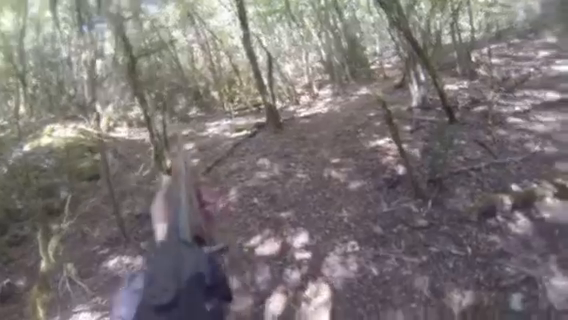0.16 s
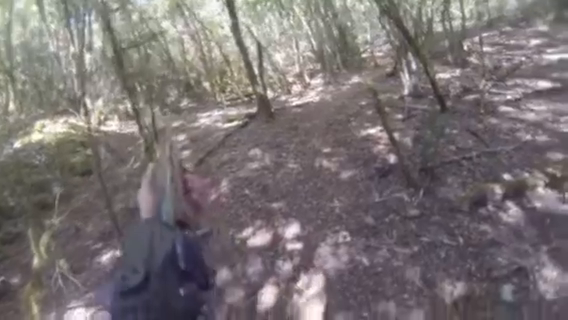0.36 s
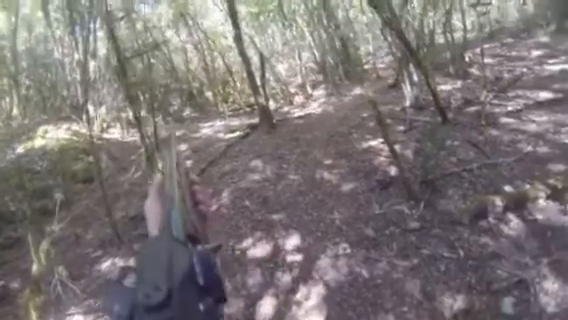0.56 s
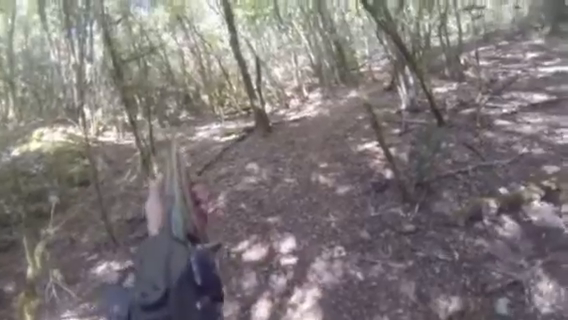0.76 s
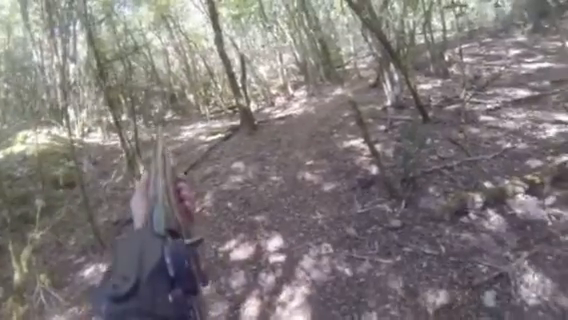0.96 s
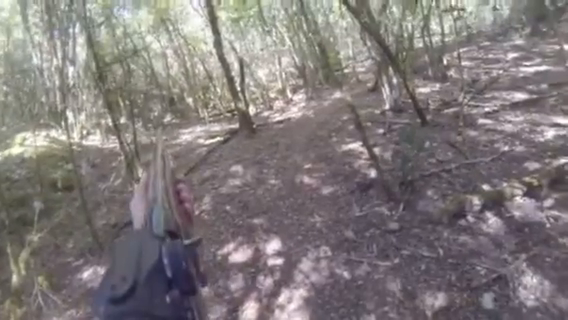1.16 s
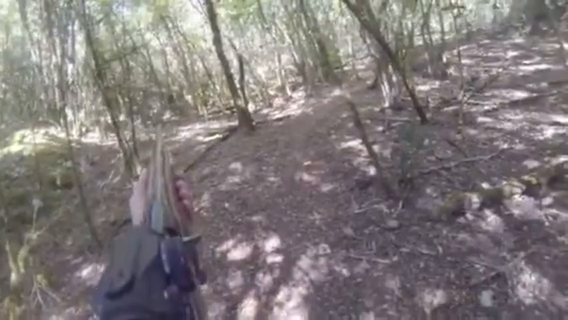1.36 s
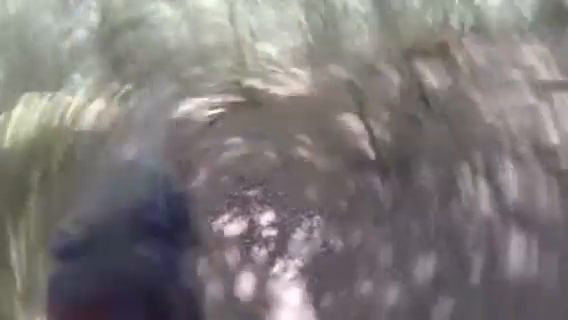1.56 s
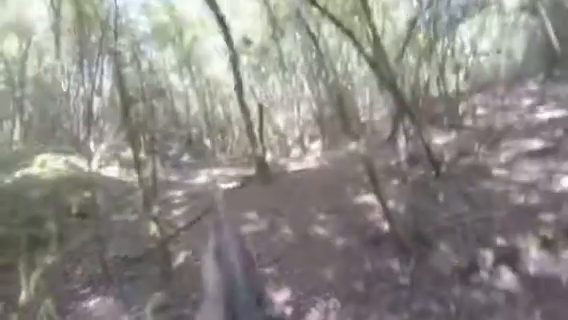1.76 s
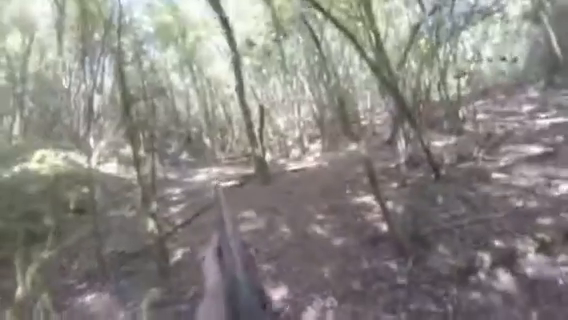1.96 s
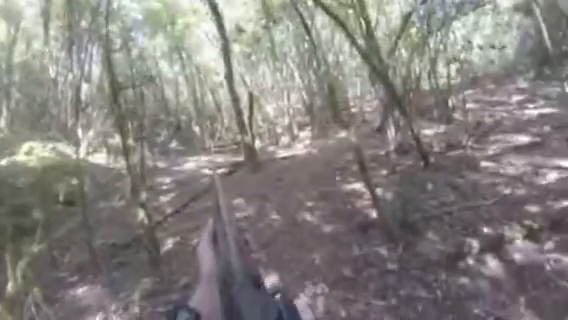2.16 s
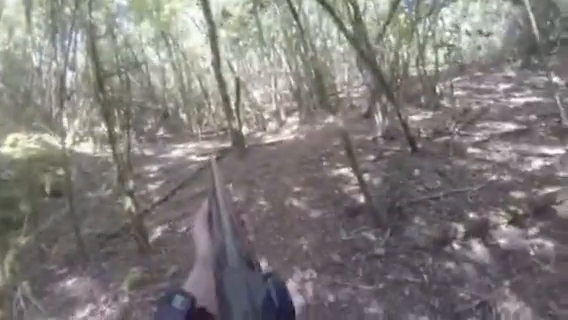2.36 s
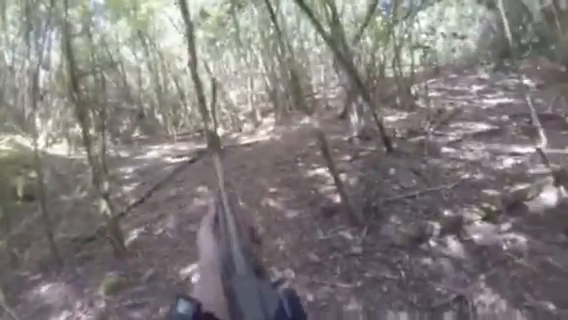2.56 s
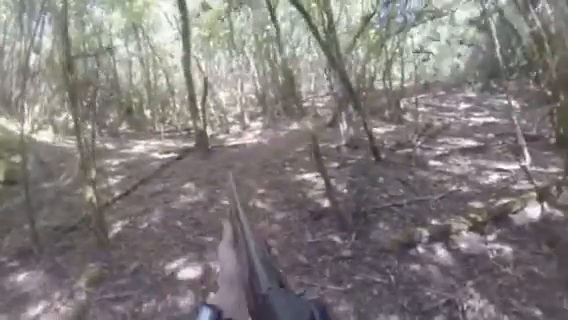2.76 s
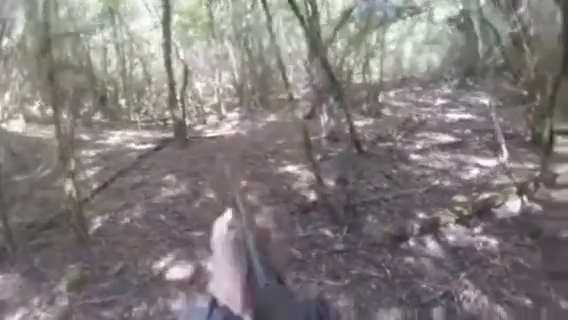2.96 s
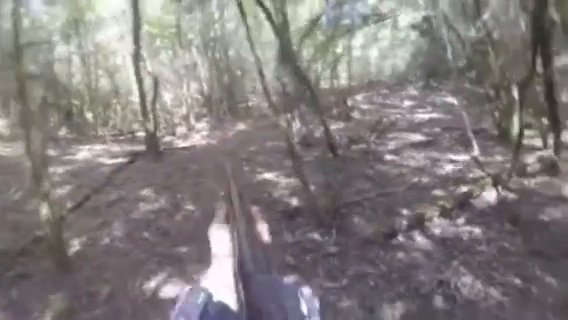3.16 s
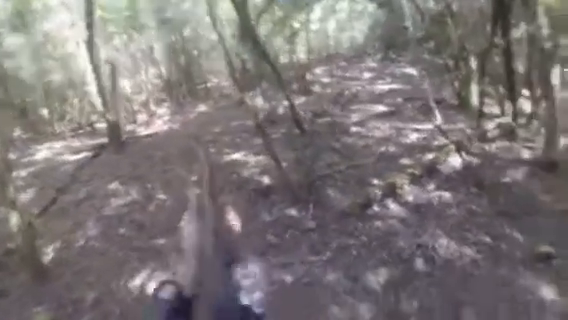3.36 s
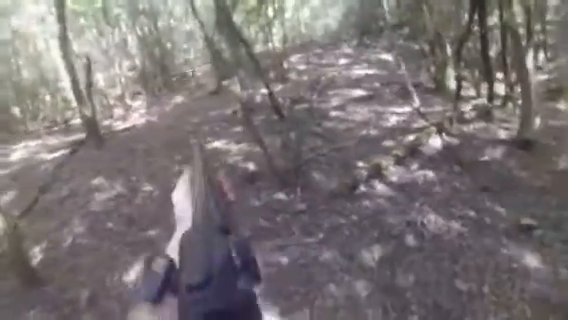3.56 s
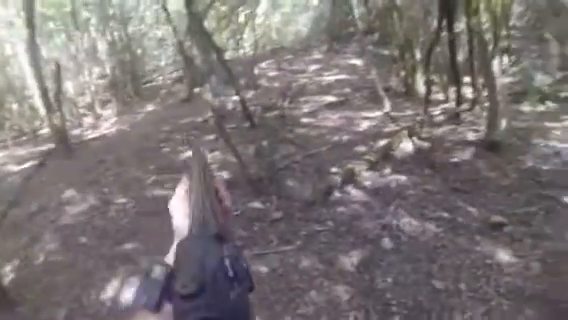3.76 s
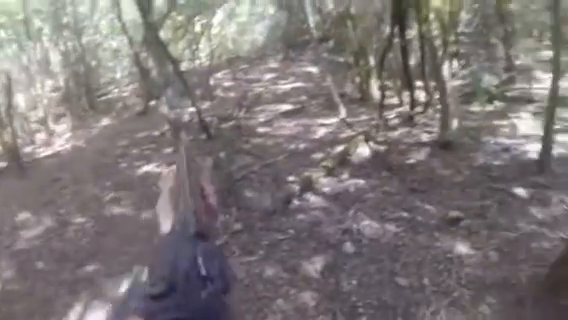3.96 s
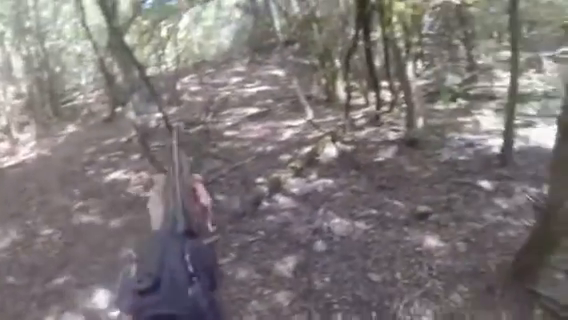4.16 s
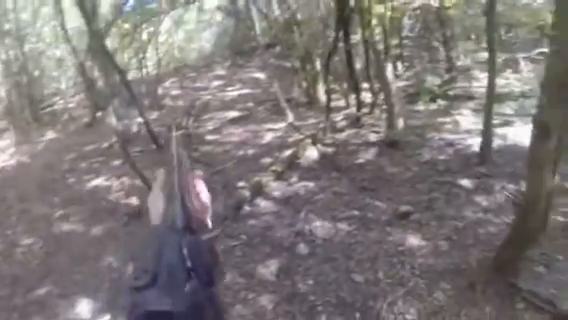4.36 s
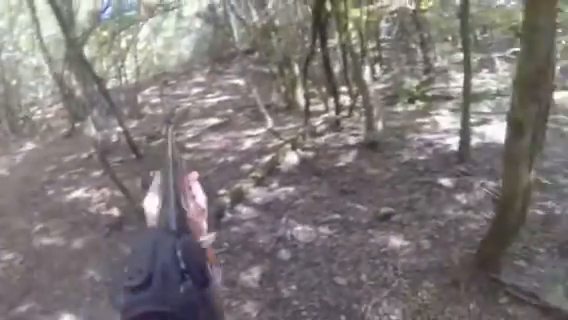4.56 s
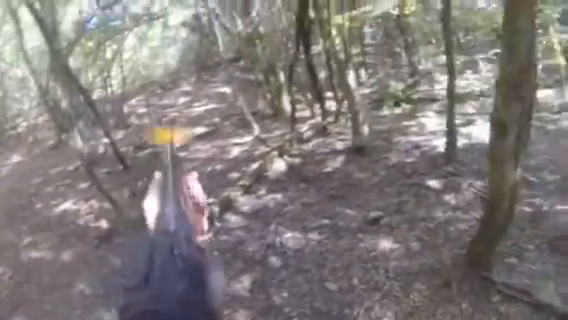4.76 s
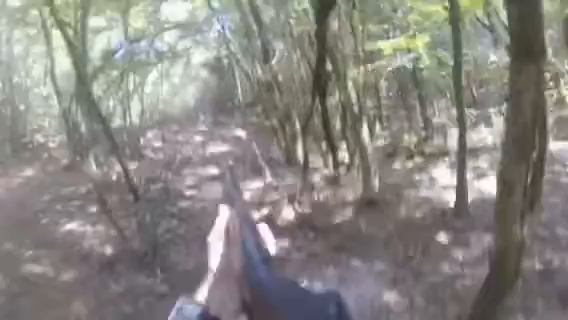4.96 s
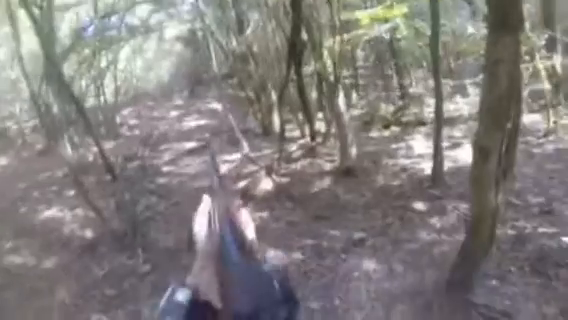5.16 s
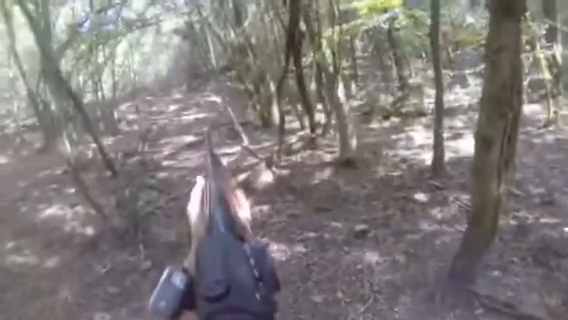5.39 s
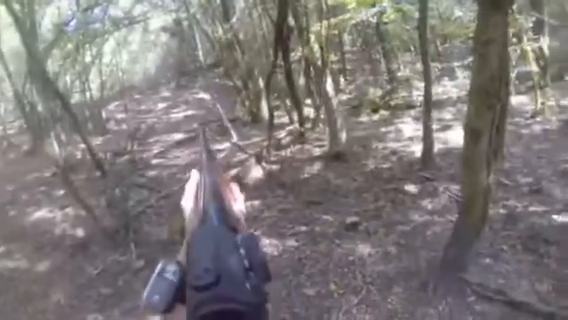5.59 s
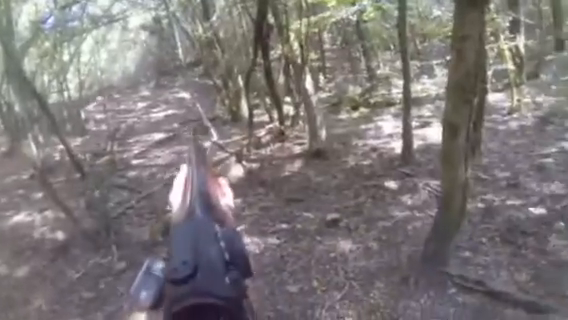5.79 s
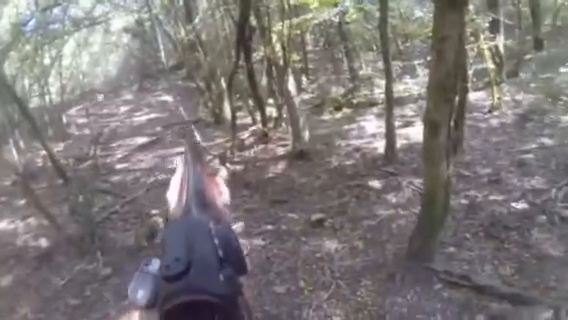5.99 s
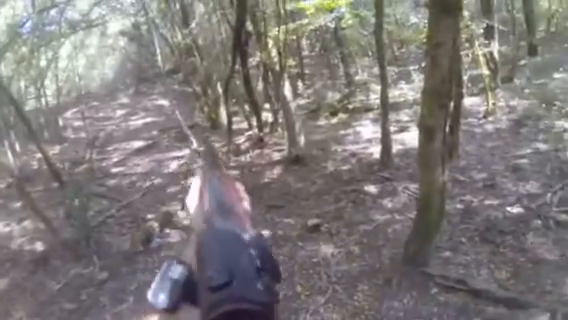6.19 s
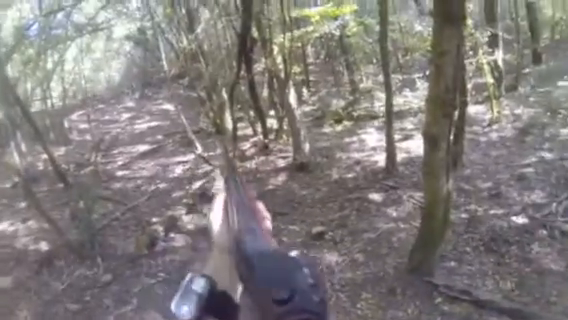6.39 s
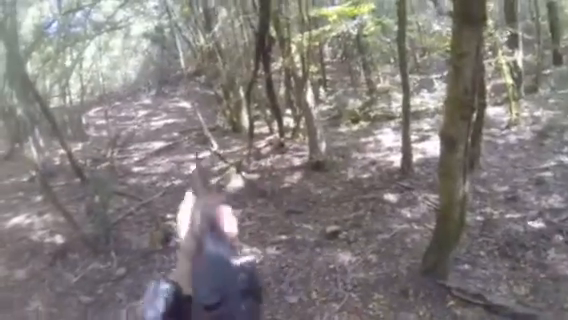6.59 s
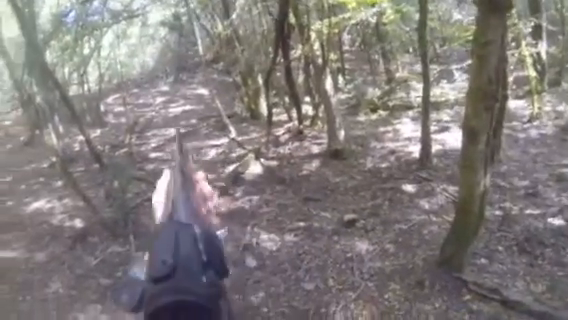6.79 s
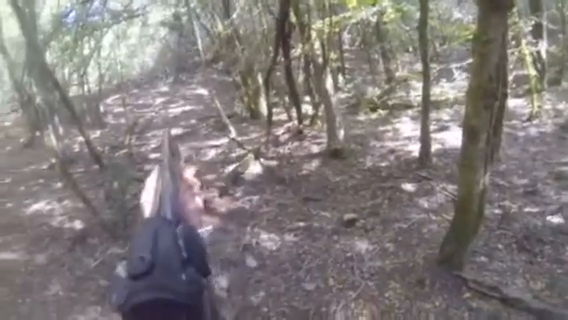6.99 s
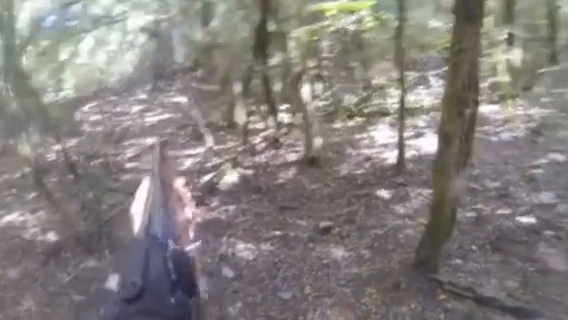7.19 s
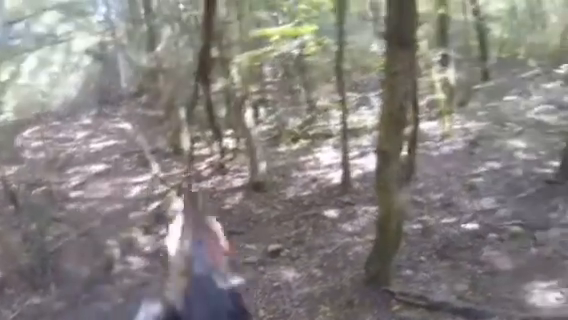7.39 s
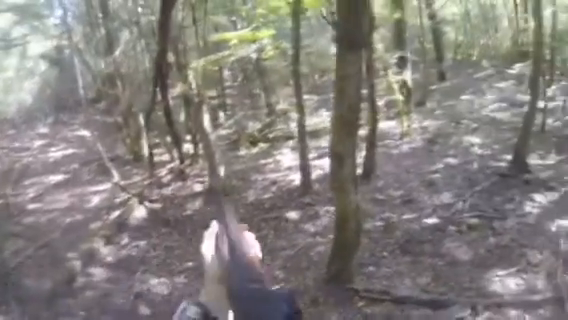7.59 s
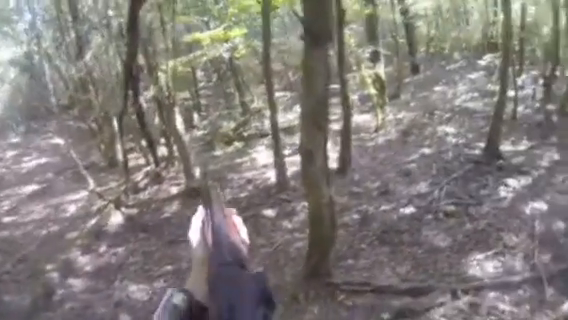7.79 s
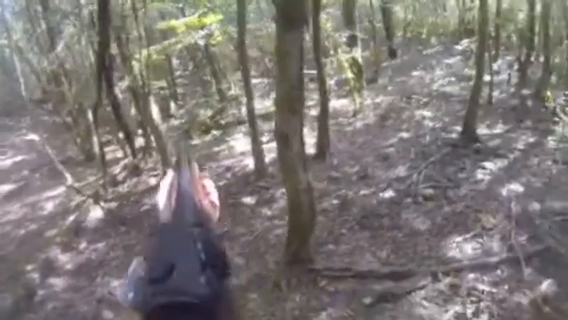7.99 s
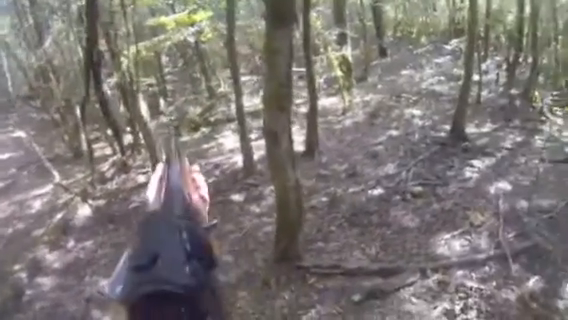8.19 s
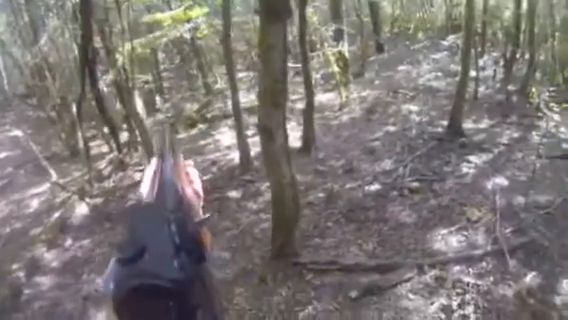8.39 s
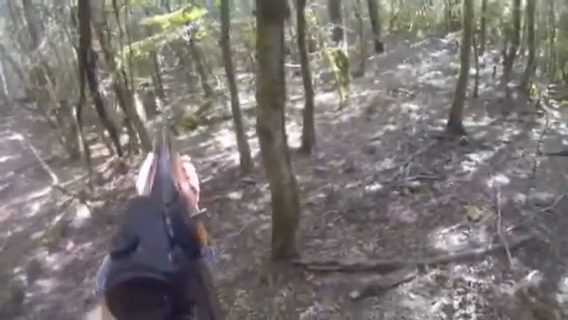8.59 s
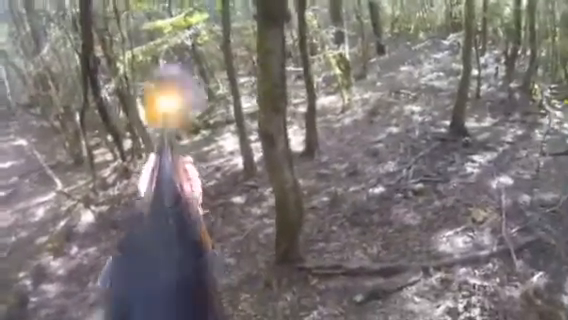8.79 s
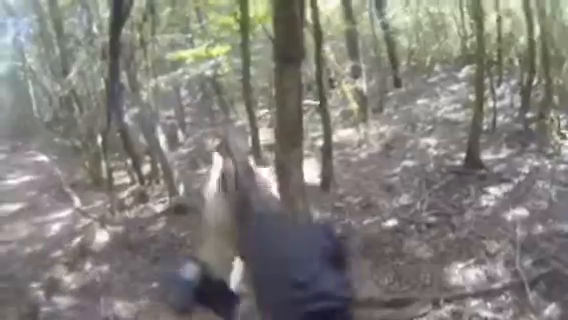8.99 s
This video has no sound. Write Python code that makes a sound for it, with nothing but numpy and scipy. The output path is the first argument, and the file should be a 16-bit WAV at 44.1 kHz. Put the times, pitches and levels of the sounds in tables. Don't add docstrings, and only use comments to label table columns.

```python
import sys
import numpy as np
from scipy import signal
from scipy.fft import rfft, irfft, next_fast_len
from scipy.io import wavfile
from scipy.ndimage import uniform_filter1d

SR = 44100
rng = np.random.default_rng(int(sys.argv[2]) if len(sys.argv) > 2 else 0)


def waveform_to_disk(signal):
    frames = np.transpose(np.atleast_2d(signal))
    scaled = np.clip(frames, -1, 1) * 32767
    samples = np.round(scaled).astype(np.int16)
    wavfile.write(sys.argv[1], SR, samples)


def field_ratio(decibels):
    return 10 ** (np.asarray(decibels, dtype=float) / 20)


N = 398663
SIZE = next_fast_len(N)
FREQ, TIME = np.fft.rfftfreq(SIZE, 1 / SR) + 1e-3, np.arange(N) / SR


def unit(x):
    return x / np.sqrt(np.mean(x ** 2))


def add(out, start_s, x):
    i = int(start_s * SR)
    out[i:i + len(x)] += x[:N - i]


def curve(table, at):
    s, *columns = np.transpose(table)
    return [np.interp(at, s, column) for column in columns]


def colour(table, hz):
    f, db = np.transpose(table)
    return np.interp(np.log(hz), np.log(f), db)


def shaped(x, table, lo_hz, hi_hz):
    spectrum = rfft(x, SIZE) * field_ratio(colour(table, FREQ))
    reference = irfft(spectrum * (FREQ > lo_hz) * (FREQ < hi_hz), SIZE)
    return irfft(spectrum, SIZE)[:N] / np.std(reference)


def band(x, hz, width_hz):
    b, a = signal.iirpeak(min(hz, .45 * SR), max(hz / width_hz, .3), SR)
    return signal.lfilter(b, a, x)


def lowpass(x, order, hz):
    return signal.sosfilt(signal.butter(order, hz, fs=SR, output="sos"), x)


def walk(rate_hz, step=32):
    k = int(SR / rate_hz / step)
    held = np.repeat(rng.standard_normal(N // (k * step) + 2), k)
    slewed = uniform_filter1d(uniform_filter1d(held, k), k)
    return 1.16 * np.interp(TIME * SR / step, np.arange(len(held)), slewed)


def grains(rate_hz, spread_db):
    sizes = field_ratio(spread_db * np.minimum(rng.exponential(size=N), 3.))
    return unit(rng.standard_normal(N) * (rng.random(N) < rate_hz / SR) * sizes)


def snaps(table, trim_db):
    out, t = np.zeros(N), np.arange(8192) / SR
    for s, db, hz, share, t60_s in table:
        width_hz = hz * np.clip(share, .005, 2)
        noise = rng.standard_normal(2 * len(t))
        snap = unit(band(band(noise, hz, width_hz), hz, 1.3 * width_hz)[len(t):])
        envelope = np.clip(t / 0.00034, 0, 1) * 1000 ** (-t / max(t60_s, .003))
        add(out, s, field_ratio(db + trim_db) * snap * envelope)
    return out


# start in seconds, peak in dB, centre in Hz, width as a share of the centre.
CLOTH_TICKS = [(.045, -50, 1600, 1.4), (3.254, -33.5, 3300, 0.32), (3.31, -38, 3000, 1.7),
               (3.43, -53, 13500, .3), (3.517, -30.5, 350, 1.6), (3.77, -39.5, 1500, .8),
               (3.83, -35, 2100, .5), (3.877, -41, 3500, .45), (3.878, -41, 300, 1.0),
               (3.939, -36, 230, .9), (4.2251, -34, 1770, 0.35), (4.75, -40.5, 2380, 0.28),
               (4.79, -41, 3000, .4), (5.44, -46, 12500, .4), (6.302, -39, 2300, .18),
               (7.787, -42, 2800, .6), (8.327, -43, 2800, .3), (8.35, -42, 2000, 1)]
# start in seconds, peak in dB, centre in Hz, width as a share of the centre, T60 in seconds.
BRUSHES_AND_CASES = [(.0, -45.5, 1500, 2., .14), (1.568, -23.5, 9270, .005, .31),
                     (1.627, -18, 7000, .7, .04), (2.377, -56, 6400, .012, .2),
                     (2.377, -62, 9300, .011, .22), (2.377, -75, 13400, .01, .3),
                     (3.53, -43, 1500, 2., .35), (3.8, -47, 2200, 1.9, .3), (3.86, -49, 3500, 1.1, .22),
                     (4.918, -23, 7500, .8, .03), (7.72, -50, 1500, 2., .4)]


def clothing_and_metal():
    tick_t60_s = 0.021
    return snaps([(*row, tick_t60_s) for row in CLOTH_TICKS] + BRUSHES_AND_CASES, -4.0)


# frequency in Hz, level in dB per Hz.
LEAF_COLOUR = [(180, -39), (300, -12), (372, -9.5), (476, -9), (821, -8), (937, -9.5), (1700, -9),
               (3070, -10), (5850, -4.5), (7880, 1.5), (11000, -12), (15500, -34)]
# time in seconds, level in dB, body of the rustle in dB.
STIRRING = [(0, -54.5, -2), (.33, -63, 2), (1.1, -62.5, -1.5), (1.52, -62, 1), (2.3, -63, -4),
            (2.75, -61.5, -2), (3.03, -52.5, 4.5), (3.45, -52.5, 3), (3.8, -49, 0), (4.12, -53.5, 0),
            (4.8, -50, -2), (5.5, -52.5, -5), (5.84, -52.5, -7), (6.14, -50, 0), (6.55, -52, -2),
            (7.4, -53, -1.5), (7.98, -57, 3), (8.84, -57.5, 1.5)]
# start in seconds, peak in dB, centre in Hz, lift of the leaves in dB.
TWIG_SNAPS = [(0.0493, -39, 6730, -5), (2.389, -38, 6320, 1), (2.537, -41, 7060, 1), (2.6249, -40, 7960, 5),
              (2.6525, -43, 8050, 5), (2.8194, -35, 6950, 1), (3.047, -31, 6450, 6.5),
              (3.089, -31, 7100, -3.5), (3.2184, -32, 5100, 3.5), (3.299, -36, 7000, 4.5),
              (3.521, -31, 7800, 9), (3.6212, -31, 7480, -2.5), (3.7693, -35, 7040, 0.5),
              (3.8386, -36, 7700, 6), (3.9574, -32.5, 7840, 0.5), (4.222, -39, 7000, 5),
              (4.322, -30, 6800, 2), (4.538, -31, 7260, 2), (6.0285, -32, 7000, 3.5),
              (6.0806, -33.5, 7100, 1), (6.2068, -32, 6280, 2.5), (6.2226, -26, 6940, 0.5),
              (6.5625, -42, 7000, 3.5), (7.0509, -30.5, 8140, -0.5), (7.0735, -32.5, 7330, 1),
              (7.5797, -35.5, 6390, 1), (7.7854, -27.5, 8190, 5), (8.3525, -41.5, 6900, 5),
              (8.828, -38, 7500, -1), (8.837, -41, 6950, 9.5)]


def leaves(duck):
    settle_s = 0.1
    level_db, body_db = curve(STIRRING, TIME)
    for s, _, _, lift_db in TWIG_SNAPS:
        level_db = level_db + lift_db * (TIME > s) * np.exp(-np.abs(TIME - s) / settle_s)
    crackle = grains(1200, 3.) * field_ratio(3. * walk(30))
    rustle = shaped(rng.standard_normal(N) + .42 * crackle, LEAF_COLOUR, 5000, 10000)
    body = lowpass(rustle, 2, 4200)
    body_gain = field_ratio(body_db + 1.5 * walk(12)) - 1
    return (rustle + body_gain * body) * field_ratio(level_db + .7 * walk(20)) * duck


def twigs():
    width_share, t60_s = 0.5, 0.029
    return lowpass(snaps([(s, db, hz, width_share, t60_s) for s, db, hz, _ in TWIG_SNAPS], -7.0), 3, 9500)


# time in seconds, level in dB.
WIND_LEVEL = [(0, -51), (.054, -59), (.24, -64.5), (1.2, -57.5), (1.5, -68.5), (1.68, -40.5), (2.23, -55),
              (2.74, -54.5), (2.8, -37.5), (3.27, -38), (3.4, -48.5), (3.75, -53), (4.6, -57),
              (4.97, -42.5), (5.25, -44), (6.03, -54.5), (6.6, -57), (8.8, -61.5)]
# centre in seconds, lift in dB.
GUST_EDDIES = [(2.812, 0), (2.872, 8.5), (2.93, 8), (2.977, 15), (3.05, 8), (3.126, 9), (3.19, 5),
               (3.25, 7), (3.33, 7.5), (3.474, 4), (3.56, 9.5), (3.632, 9), (3.72, -1), (4.05, 6),
               (5.53, 0)]


def wind():
    eddy_s = 0.018
    low_db, = curve(WIND_LEVEL, TIME)
    low_db = low_db + sum(db * np.exp(-((TIME - s) / eddy_s) ** 2) for s, db in GUST_EDDIES)
    upper_db = -9 - 0.26 * (low_db + 60)
    low = unit(band(band(rng.standard_normal(N), 51.7, 57.4), 23, 47))
    upper = unit(band(band(rng.standard_normal(N), 100, 100), 110, 140))
    return field_ratio(low_db + 3.1 * walk(30)) * (low + field_ratio(upper_db + 1.6 * walk(25)) * upper)


# frequency in Hz, level in dB per Hz.
HUSH_COLOUR = [(59, -47), (100, -13), (153, -4), (300, -2), (861, -11), (3320, -18.5), (7890, -3.5),
               (11300, -21.5), (15500, -40)]


def hush():
    level_db = -63 - 1.5 + 0.42 * walk(1.5)
    return lowpass(field_ratio(level_db) * shaped(rng.standard_normal(N), HUSH_COLOUR, 150, 3000), 2, 4000)


# frequency in Hz, level in dB.
WHINE_TONES = [(10998, -74)]


def whine(duck):
    tones = sum(field_ratio(db - 1.0 + 2 * walk(3)) * np.sin(2 * np.pi * hz * TIME) for hz, db in WHINE_TONES)
    return uniform_filter1d(duck, SR // 2, origin=SR // 5) ** 4 * tones


# start in seconds, peak in dB.
HAMMER_FALLS = [
    (1.532, -20),
    (4.8186, -16),
    (8.8511, -16.5),
]


def hammer():
    out, t = np.zeros(N), np.arange(8192) / SR
    for s, db in HAMMER_FALLS:
        tick = unit(band(band(rng.standard_normal(len(t)), 3600, 7000), 3500, 6000))
        add(out, s, field_ratio(db - 8.5) * tick * np.clip(t / 0.00056, 0, 1) * 1000 ** (-t / 0.016))
    return out


# start in seconds, peak in dB.
MUZZLE_BLASTS = [
    (1.5398, -5.5),
    (4.8286, -6.5),
    (8.8592, -6),
]
# frequency in Hz, level in dB above the blast peak.
PORT_RINGS = [
    (6150, 4),
    (6900, 0),
    (6200, 1),
]


def blast(hold_s=0.0064, flap_hz=1050):
    out, t = np.zeros(N), np.arange(8192) / SR
    gate = np.clip(t / 0.00044, 0, 1) * np.exp(-np.clip(t - hold_s, 0, 1) / 0.00088)
    push = -np.sin(np.pi * np.clip(t / hold_s, 0, 1) ** 1.3) ** 2
    back = (t > hold_s) * (1 - np.exp(-np.abs(t - hold_s) / 0.0022)) * np.exp(-t / 0.029)
    for (s, db), (ring_hz, ring_db) in zip(MUZZLE_BLASTS, PORT_RINGS):
        noise = rng.standard_normal((3, len(t)))
        jet = unit(band(band(noise[0], 7360, 2400), 4700, 3500))
        flap = unit(band(noise[1], flap_hz, 500))
        roar = 0.95 * jet + 0.86 * flap
        ring = np.sin(2 * np.pi * ring_hz * t) * np.exp(-((t - .0008) / .0007) ** 2)
        near = (t > hold_s) * unit(band(band(noise[2], 3700, 5000), 4700, 8000)) * np.exp(-t / 0.025)
        direct = field_ratio(-2.5) * gate * roar + field_ratio(ring_db) * ring + field_ratio(-1.0) * push
        after = field_ratio(-15.0) * back + field_ratio(-17.5) * near
        add(out, s - .0001, field_ratio(db) * (direct + after))
    return out


def gain_control():
    duck = np.ones(N)
    for s, _ in MUZZLE_BLASTS:
        duck *= 1 - 0.56 * (TIME > s) * np.exp(-np.abs(TIME - s) / 0.14)
    return duck


# frequency in Hz, level in dB per Hz.
SCATTER_COLOUR = [(24, -35), (40, -13), (359, -0.5), (449, -1), (637, -1), (973, -7.5), (1250, -7),
                  (2840, -13.5), (7160, -18.5), (10100, -23.5), (15500, -47)]
# delay in seconds, level in dB, loss at 4 kHz in dB, bass in dB.
ECHO_COURSE = [
    (0, -20, 5.5, 7.5),
    (.04, -25.5, 4, 8),
    (.12, -30.5, 5, 0),
    (.34, -25, 1, -37),
    (.55, -31, -6.5, -24),
    (.85, -37, -16, -18),
    (1.07, -36.5, -11.5, -25),
    (1.5, -48.5, -10, -11),
    (2.4, -67.5, -23, 0),
]
# level in dB, extra decay in dB per second, extra loss at 4 kHz in dB, depth of the woods as a share.
SHOT_AIM = [
    (-0.86, 1.5, 0.3, 1.006),
    (0.2, 0.9, -1, .98),
    (0.2, .1, -.6, 1.01),
]
# lift in dB, delay in seconds, spread in seconds.
GROUND_BOOM = [
    (9, 0.99, .35),
    (14, 0.77, 0.47),
    (9.5, 0.14, 0.052),
]


def woodland(knee_hz=4000, power=0.85, bass_hz=150, air_db=-33, boom_hz=265, foliage_top_hz=8500):
    trunks = rfft(shaped(grains(30000, 1.5), SCATTER_COLOUR, 400, 1200), SIZE)
    trim_db = np.full(N, -200.)
    boom_db, late_s, dull_db = np.zeros((3, N))
    for (shot, _), aim, (lift_db, boom_s, spread_s) in zip(MUZZLE_BLASTS, SHOT_AIM, GROUND_BOOM):
        db, decay_db, extra_db, depth = aim
        after = TIME >= shot + .0065
        late_s[after] = (TIME[after] - shot) / depth
        dull_db[after] = extra_db
        trim_db[after] = db + decay_db * late_s[after]
        boom_db[after] = -9 + lift_db * np.exp(-((late_s[after] - boom_s) / spread_s) ** 2)
    level_db, loss_db, bass_db = curve(ECHO_COURSE, late_s)
    fade = np.clip((ECHO_COURSE[-1][0] + .3 - late_s) / 0.37, 0, 1)
    level = field_ratio(level_db + trim_db + 0.6 * walk(40)) * fade
    out, shared_db = np.zeros(N), 0.3 * walk(25)
    for hz in 30 * 2 ** np.arange(0, 9.3, 1 / 3):
        part = irfft(trunks * np.clip(1 - 3 * np.abs(np.log2(FREQ / hz)), 0, 1), SIZE)[:N]
        foliage = (loss_db + dull_db) * (np.clip(hz - 500, 0, foliage_top_hz) / knee_hz) ** power
        patchy = 1.5 * walk(14) if hz < 3000 else 0
        absorbed = air_db * late_s * (hz / 10000) ** 1.56
        boom = 0.53 * (boom_db + 7.9) * np.exp(-(np.log2(hz / boom_hz) / .5) ** 2)
        bass = bass_db / (1 + (hz / bass_hz) ** 6)
        port = 5.5 * np.exp(-(np.log2(hz / 7500) / 0.26) ** 2)
        out += part * field_ratio(port + foliage + absorbed + boom + bass + shared_db + patchy)
    return out * level


# start in seconds, peak in dB, pitch in Hz, rise in cycles.
BANK_ECHOES = [(1.586, -12.5, 276, 0.83), (1.623, -28, 412, 1.3), (1.629, -14, 680, 1),
               (4.873, -7.5, 457, 0.83), (4.885, -12.5, 452, 1.1), (4.909, -9, 496, 0.82),
               (5.083, -17.5, 373, 2.1), (5.695, -19, 260, 1.1), (5.769, -19.5, 286, 1.8),
               (5.826, -15, 320, 1.4), (8.883, -21, 372, 0.72), (8.905, -5, 610, 0.83),
               (8.927, -13.5, 533, 2.1)]


def banks():
    out, t = np.zeros(N), np.arange(2048) / SR
    for s, db, hz, cycles in BANK_ECHOES:
        swell = t * hz / cycles
        add(out, s, field_ratio(db - 5.0) * np.sin(2 * np.pi * hz * t) * swell * np.exp(1 - swell))
    return out


# start in seconds, peak in dB, pitch in Hz.
BODY_KNOCKS = [
    (1.625, -12, 60),
    (3.513, -27, 155),
    (3.585, -32, 201),
    (3.873, -34, 191),
    (3.931, -31, 151),
    (4.027, -36, 159),
    (7.017, -34.5, 239),
]


def knocks():
    out, t = np.zeros(N), np.arange(4096) / SR
    for s, db, hz in BODY_KNOCKS:
        add(out, s, field_ratio(db - 11) * np.sin(2 * np.pi * hz * t) * 1000 ** (-t / 0.085))
    return out


def scene():
    duck = gain_control()
    ground = clothing_and_metal() + leaves(duck) + twigs()
    surroundings = duck * (wind() + knocks() + hush()) + whine(duck)
    shots = hammer() + blast() + woodland() + banks()
    mono = ground + surroundings + shots
    return np.array([mono, mono])


def band_limit(x):
    return signal.sosfilt(signal.butter(12, 15700, fs=SR, output="sos"), x)


def record(dry):
    corners = np.clip(dry, -1.1, 1.1) - dry
    soft = dry + signal.sosfiltfilt(signal.butter(3, 9000, fs=SR, output="sos"), corners)
    top = signal.ellip(8, .1, 60, 15300, fs=SR, output="sos")
    mix = np.clip(signal.sosfilt(top, np.clip(soft, -.92, .92)), -1, 1)
    return band_limit(mix)


dry = scene()
out = record(dry)
waveform_to_disk(out)
```